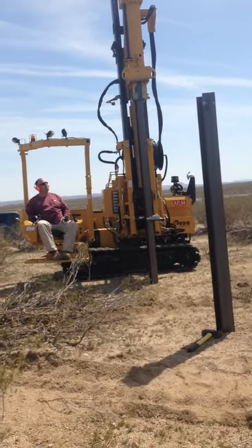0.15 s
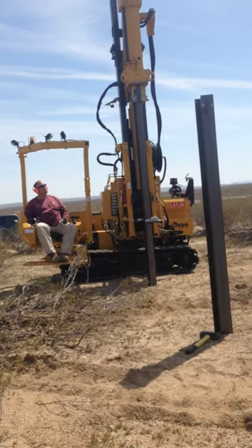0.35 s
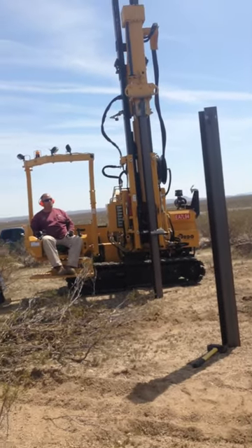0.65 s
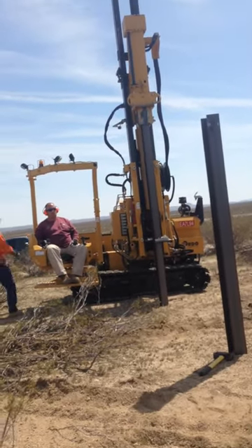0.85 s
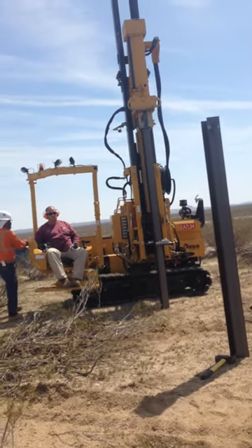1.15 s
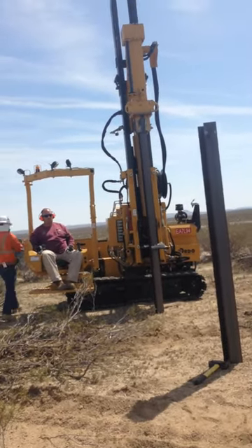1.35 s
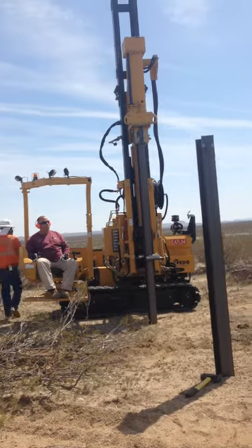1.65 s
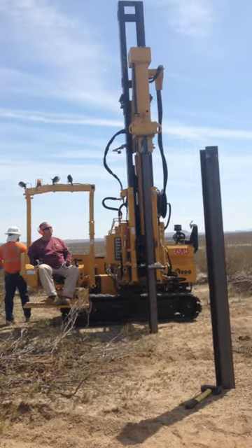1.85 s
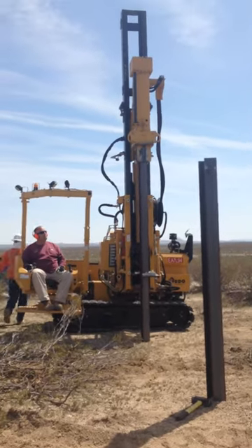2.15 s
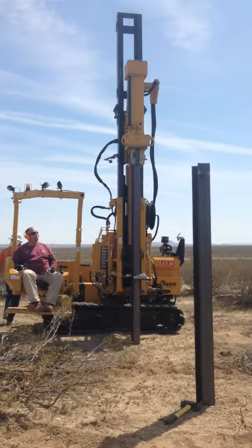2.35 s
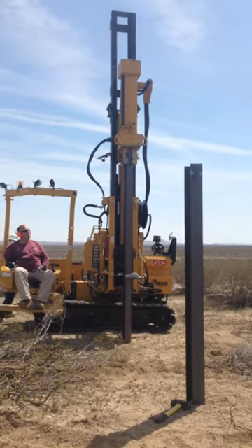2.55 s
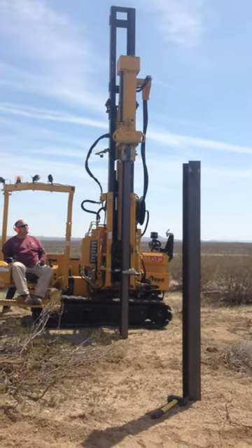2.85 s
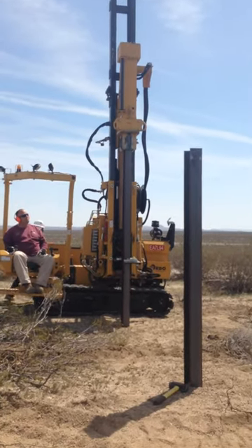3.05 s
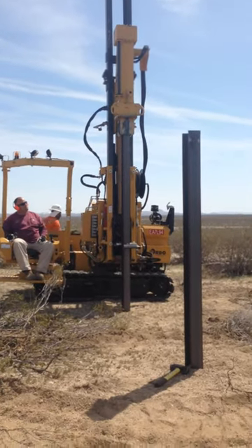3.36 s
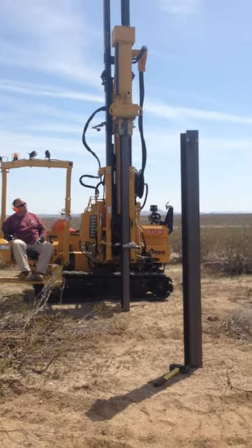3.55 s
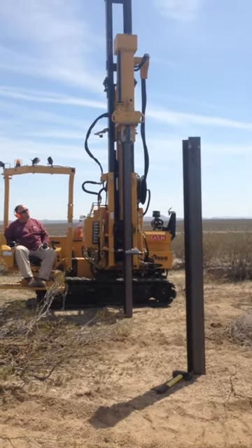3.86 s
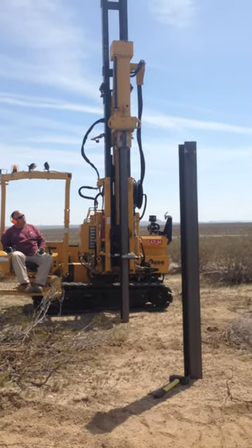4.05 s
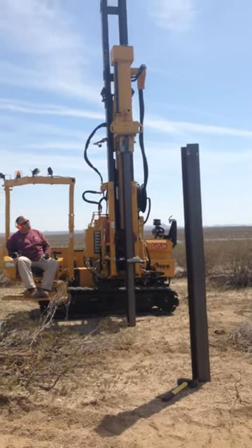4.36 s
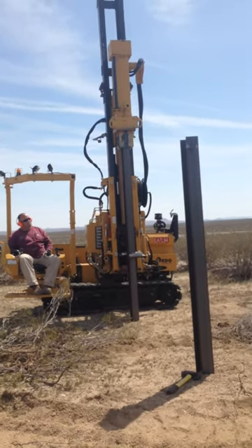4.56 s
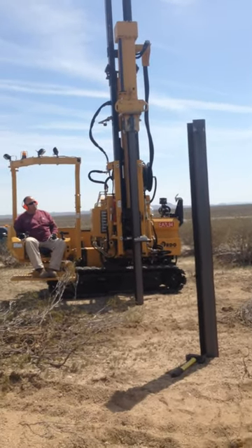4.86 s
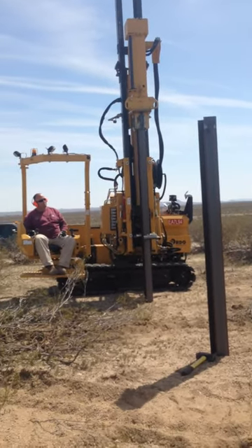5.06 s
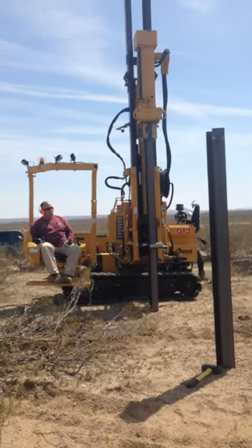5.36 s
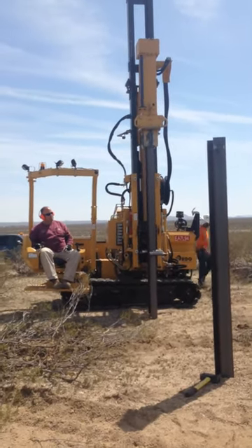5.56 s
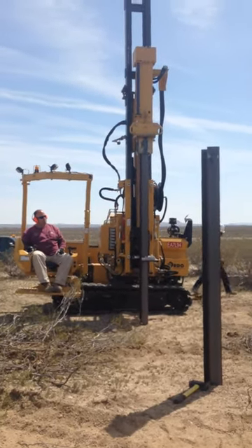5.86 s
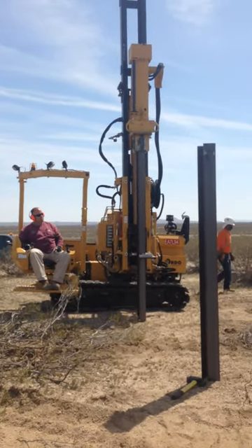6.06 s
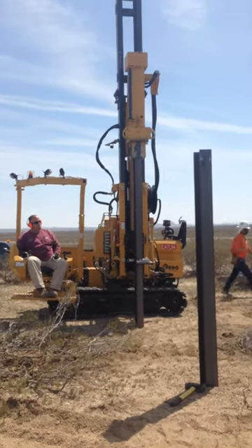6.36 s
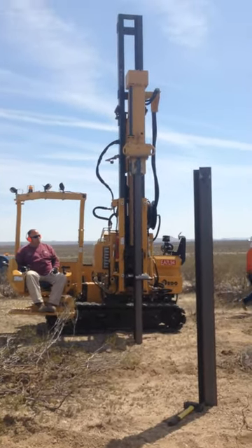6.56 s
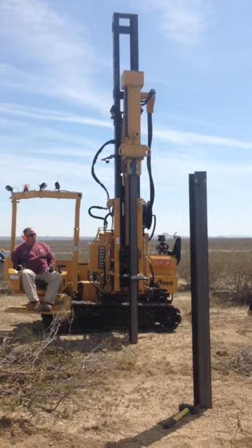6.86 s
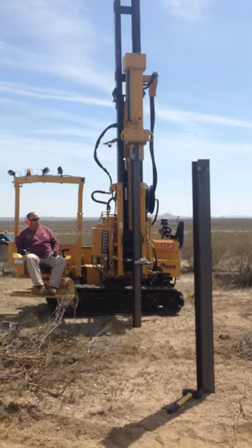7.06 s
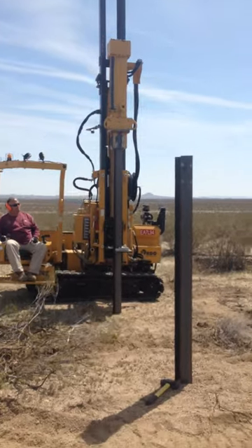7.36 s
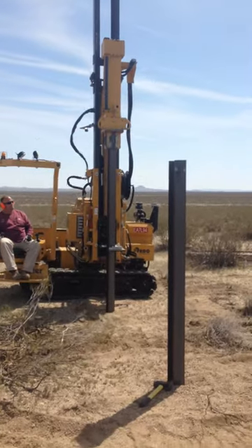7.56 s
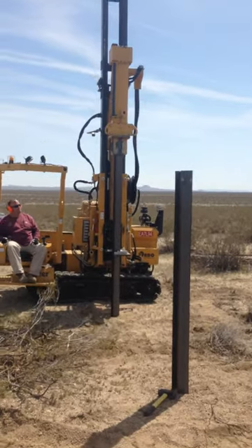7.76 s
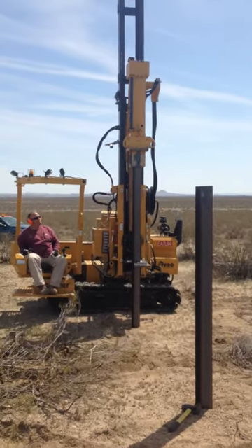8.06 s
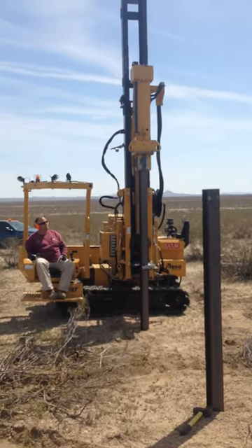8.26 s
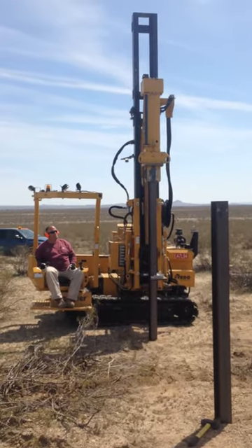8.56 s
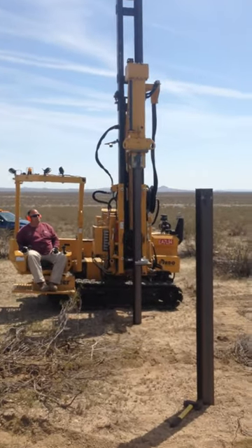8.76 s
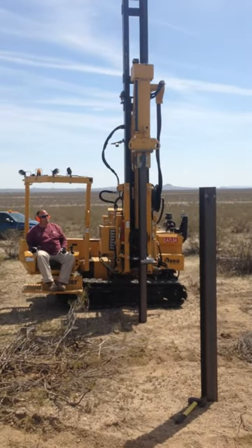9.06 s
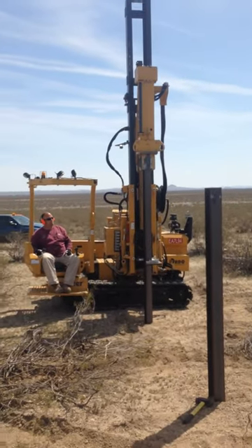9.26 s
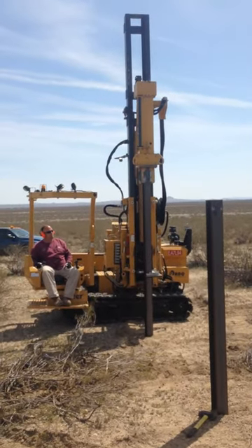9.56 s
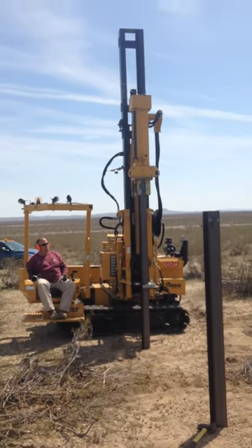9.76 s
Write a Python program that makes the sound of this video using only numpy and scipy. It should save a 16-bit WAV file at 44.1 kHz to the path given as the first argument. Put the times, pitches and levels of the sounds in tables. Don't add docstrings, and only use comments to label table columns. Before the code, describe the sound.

In open country, a hydraulic hammer drives a steel pile with continuous rapid blows, about sixteen a second. Each ticks, thuds and clangs, then a piercing high ring swells before the next. A diesel hums and roars beneath, with faint wind rumble. Late on, the handheld microphone turns and the thud grows harder and more midrange.

```python
import sys
import numpy as np
from scipy import signal
from scipy.fft import rfft, irfft
from scipy.io import wavfile
from scipy.ndimage import uniform_filter1d, minimum_filter1d

SR = 44100
rng = np.random.default_rng(int(sys.argv[2]) if len(sys.argv) > 2 else 0)


def unload_wav(signal):
    wavfile.write(
        sys.argv[1],
        SR,
        np.round(np.clip(np.atleast_2d(signal).T, -1, 1) * 32767).astype(np.int16),
    )


def boost_factor(decibels):
    exponent = np.asarray(decibels, float) / 20
    return 10 ** exponent


N = 436581
LENGTH, CONTACT = 12000, 3000
BLOW_HZ = np.fft.rfftfreq(LENGTH, 1 / SR)

# time in seconds, share of the turned view (0-1).
TURN = [
    (7.0, 0.13),
    (7.6, 0.99),
]
# time in seconds, then levels of machine, web clang,
# flange clang and flange ring in dB.
FACING = [(0.0, -27.5, -35.5, -14.5, -21), (0.65, -28, -34, -14.5, -20), (1.4, -26.5, -35, -12, -24.5),
          (1.7, -24.5, -33.5, -22, -17), (2.05, -22, -28, -17.5, -17), (2.3, -25.5, -33, -15, -17.5),
          (2.6, -20.5, -27.5, -13, -13.5), (2.9, -24.5, -34.5, -14, -19.5), (3.599, -23, -33, -19.5, -16.5),
          (4.399, -22, -31.5, -17.5, -19.5), (5.2, -25, -37, -10.5, -19.5), (6.0, -26, -38.5, -11, -22.5),
          (6.902, -26.5, -40.5, -12.5, -23.5), (7.701, -22.5, -25, -21.5, -16.5),
          (8.0, -22.5, -24, -17, -20), (8.3, -22, -28.5, -16, -25.5), (9.1, -23, -28.5, -12.5, -29),
          (9.9, -23, -32.5, -19, -19)]
# time in seconds, blows struck so far (count).
PACE = [(0.0076, 0), (0.6761, 11), (1.5239, 25), (2.1867, 36), (3.8251, 63), (4.0689, 67), (4.3117, 71),
        (4.7422, 78), (5.1077, 84), (6.1589, 101), (6.4638, 106), (7.8272, 128), (8.5101, 139),
        (9.8704, 161)]

BLOW_COUNT = 162
LEAD_S, JITTER_S = 0.0008, 0.0003
PACE_S, PACE_BLOWS = np.transpose(PACE)
BLOW_S = np.interp(np.arange(BLOW_COUNT), PACE_BLOWS, PACE_S) - LEAD_S
BLOW_S = BLOW_S + JITTER_S * rng.standard_normal(BLOW_COUNT)


def evened(x):
    return x / np.sqrt(np.mean(x ** 2) + 1e-20)


def read(points, hz):
    f, value = np.transpose(points)
    return np.interp(np.log(hz + 1), np.log(f + 1), value)


def causal(points):
    log_gain = np.log(boost_factor(read(points, BLOW_HZ)))
    mirrored = np.r_[log_gain, log_gain[-2:0:-1]]
    return np.exp(np.conj(signal.hilbert(mirrored)))[:len(BLOW_HZ)]


def band_response(order, edges_hz):
    sos = signal.butter(order, edges_hz, "band", fs=SR, output="sos")
    return signal.sosfreqz(sos, BLOW_HZ, fs=SR)[1]


def flange_guide():
    return band_response(2, (2730, 2985))


def turned_share(t):
    return np.interp(t, *np.transpose(TURN))


def breeze():
    level_db, gust_db, gusts_per_s = -55, 4, 14
    rumble = signal.sosfilt(signal.butter(2, 120, fs=SR, output="sos"), rng.standard_normal(N))
    lumps = rng.standard_normal(200)
    gusts = np.interp(np.arange(N) / SR * gusts_per_s, np.arange(len(lumps)), lumps)
    return boost_factor(level_db + gust_db * gusts) * evened(rumble)


def engine():
    # frequency in Hz, level in dB per Hz.
    roar_colour = [(25, -52.5), (60, -33), (100, -22.5), (220, -25), (420, -29.5), (800, -22),
                   (1600, -25.5), (2500, -20.5), (3500, -30.5), (4500, -53), (6500, -53), (9000, -68),
                   (10600, -52), (12500, -68), (16000, -74.5)]
    firing_hz = 102.3
    t = np.arange(N) / SR
    nearer_db = np.interp(t, *np.transpose(FACING)[:2]) + 23

    phase = 2 * np.pi * firing_hz * t + 1.73
    tone = np.sin(phase) + boost_factor(-14.5) * np.sin(2 * phase) + boost_factor(-8.5) * np.sin(3 * phase)
    tone *= np.sqrt(2) * boost_factor(-42 + 0.94 * nearer_db)

    real, imaginary, patches = rng.standard_normal((N // 256 + 5, 513, 3)).T
    patches = uniform_filter1d(patches, size=8, axis=0)
    patches = evened(uniform_filter1d(patches, size=12, axis=1))
    colour_db = read(roar_colour, np.fft.rfftfreq(1024, 1 / SR))[:, None]
    cells = (real + 1j * imaginary) * boost_factor(colour_db + 2.5 * patches)
    roar = evened(signal.istft(cells, nperseg=1024, noverlap=768)[1][:N])
    return tone + boost_factor(-32 + 0.95 * nearer_db) * roar


def contact(rise_s, t60, memory, fresh):
    t = np.arange(CONTACT) / SR
    old, new = rng.standard_normal((BLOW_COUNT, CONTACT, 2)).T
    renewal = np.sqrt(1 - memory ** 2)
    old[:, 0] /= renewal
    drift = signal.lfilter([renewal], [1, -memory], old).T
    pattern = drift * np.sqrt(1 - fresh ** 2) + fresh * new.T
    return pattern * (1 - np.exp(-t / rise_s)) ** 2 * boost_factor(-60 * t / t60)


def click(bounce_s, bounce_db):
    force = np.zeros((BLOW_COUNT, CONTACT))
    force[:, 30] = 1
    force[:, round(bounce_s * SR)] = boost_factor(bounce_db + 3 * rng.standard_normal(BLOW_COUNT))
    return force


def modes(table, sense=-1):
    t = np.arange(LENGTH) / SR
    signs = sense ** np.arange(len(table))
    rings = [boost_factor(-60 * t / t60) * np.sin(2 * np.pi * hz * t) / t60 for hz, t60, _, _ in table]
    rings = np.array(rings) * 2 * np.log(1000) / SR
    gains = boost_factor(np.transpose(table)[2:]) * signs
    return rfft(gains @ rings * (1 - np.exp(-t / 0.00051)) ** 2)


def strike(force, views, level_db, span_s):
    turned = turned_share(BLOW_S)[:, None]
    response = (1 - turned) * views[0] + turned * views[1]
    sounds = irfft(rfft(force, LENGTH) * response)
    start, stop = (np.array(span_s) * SR).astype(int)
    rms = np.sqrt(np.mean(sounds[:, start:stop] ** 2, axis=1))
    sounds *= (boost_factor(level_db) / rms)[:, None]
    out = np.zeros(N + LENGTH)
    for at, sound in zip(np.round(BLOW_S * SR).astype(int), sounds):
        out[at:at + LENGTH] += sound
    return out[:N]


def blow_levels():
    when, *parts = np.transpose(FACING)
    faced = np.array([np.interp(BLOW_S, when, part) for part in parts])
    thud_chance, web_chance, flange_chance = rng.standard_normal((3, BLOW_COUNT))
    ring_chance = 1 - rng.exponential(1, BLOW_COUNT)
    return faced + [1.2 * thud_chance, 1.9 * web_chance, 1.4 * flange_chance, 2.3 * ring_chance]


def ground(thud_db):
    t = np.arange(CONTACT) / SR
    push = np.sin(2 * np.pi * 88 * t) * t * boost_factor(-60 * t / 0.026)
    return strike(push * np.ones((BLOW_COUNT, 1)), np.ones((2, 1)), -26 + 0.68 * thud_db, (0, .03))


def rebound(thud_db):
    # frequency in Hz, t60 in seconds, level in dB, level after the turn in dB.
    touched = [(2290, .06, -2, -2), (10720, .025, -23, -21)]
    late = contact(rise_s=0.0026, t60=0.023, memory=0.38, fresh=0.22)
    late = np.roll(late, round(0.031 * SR), axis=1)
    return strike(late, modes(touched), thud_db - 19.0, (.03, .045))


def ring_dips():
    t, total_db = np.arange(N) / SR, 0
    lull_db = -5 * (1 - turned_share(t))
    for dip_db, at_s, width_s in ((-3.5, -0.0017, 0.0093), (lull_db, 0.025, 0.005)):
        nearest = np.round(np.interp(t - at_s, BLOW_S, np.arange(BLOW_COUNT))).astype(int)
        away_s = t - at_s - BLOW_S[nearest]
        total_db = total_db + dip_db * np.exp(-.5 * (away_s / width_s) ** 2)
    return boost_factor(total_db)


def ring(ring_db):
    # frequency in Hz, t60 in seconds, level in dB, level after the turn in dB.
    ring_modes = [(2771.5, .32, 0, 0), (2803, .24, -7, -6), (2845, .12, -12, -14)]
    narrow = band_response(1, (2750, 2805))
    swell = contact(rise_s=0.019, t60=0.25, memory=0.9326, fresh=0.28)
    views = narrow * flange_guide() * modes(ring_modes)
    return ring_dips() * strike(swell, views, ring_db + 2.0, (.015, .058))


def flange(flange_db):
    # frequency in Hz, t60 in seconds, level in dB, level after the turn in dB.
    flange_modes = [(2885, .022, 0, 0), (2935, .045, -9, -18)]
    sharp = click(bounce_s=.014, bounce_db=-19)
    rattle = contact(rise_s=0.0009, t60=0.092, memory=.92, fresh=0.16)
    views = flange_guide() * modes(flange_modes, sense=0.67)
    return strike(sharp + boost_factor(-29) * rattle, views, flange_db - .6, (0, .012))


def web(tap, web_db):
    # frequency in Hz, t60 in seconds, level in dB, level after the turn in dB.
    web_modes = [(1683, 0.013, -5.5, -13.5), (1762, 0.025, 4.5, 4.5), (2071, 0.081, -6, -14)]
    rattle = contact(rise_s=0.00019, t60=0.057, memory=0.956, fresh=0.058)
    return strike(tap + boost_factor(-15) * rattle, modes(web_modes), web_db + 11.0, (0, .015))


def frame(tap, thud_db):
    frame_hz = [310, 427, 550, 615, 680, 812, 1080, 2258, 2325, 3500, 4075, 4900, 5200, 5545, 5780, 6355,
                6910, 8000, 8310, 8525, 9600, 10300, 10700]
    # t60 in seconds, level in dB, level after the turn in dB.
    frame_rings = [(0.069, -9, -4), (0.09, 0, -12), (0.1, -4, -1.5), (0.11, -5.5, -4), (0.026, -27, -2),
                   (0.073, -5.5, -10.5), (0.098, -13, -15.5), (0.29, -1.5, -1.5), (0.043, 2.5, -2),
                   (0.23, -4, -10), (0.15, -20, -15), (0.15, -24.5, -25), (0.062, -30, -27),
                   (0.081, -23.5, -27.5), (0.046, -34, -27), (0.18, -46, -43), (0.16, -43, -31),
                   (0.09, -40, -40), (0.047, -37.5, -48.5), (0.04, -40.5, -48), (0.1, -46.5, -47),
                   (0.077, -36, -37), (0.027, -32, -32)]
    return strike(tap, modes(np.c_[frame_hz, frame_rings]), thud_db + 2.58, (0, .015))


def tick(thud_db):
    # frequency in Hz, level in dB per Hz.
    edge_colour = [(2000, -32), (5500, -5), (7500, -1), (9000, -9), (10700, 3.5), (12500, -8), (16000, -12)]
    edge = causal(edge_colour)
    louder = np.minimum(rng.exponential(1, BLOW_COUNT), 2.5)
    level_db = -54.0 + 1.7 * louder + 0.54 * (thud_db + 26.5)
    rattle = contact(rise_s=.0003, t60=0.062, memory=0.95, fresh=0.39)
    return strike(rattle, [edge, boost_factor(-4) * edge], level_db, (0, .01))


def thud(knock, thud_db):
    # frequency in Hz, level in dB per Hz.
    thud_colour = [(40, -28), (120, -24.5), (260, -26.5), (420, -1.5), (700, -19), (1400, -13),
                   (2600, -10.5), (3300, -15.5), (4500, -22.5), (6000, -31.5), (7500, -62.5), (10000, -39),
                   (12500, -56), (16000, -58.5)]
    # frequency in Hz, level in dB per Hz.
    thud_colour_turned = [(40, -16), (120, -28.5), (260, -18.5), (420, -17.5), (700, 7.5), (1400, 5.5),
                          (2600, -9), (3300, -0.5), (4500, -13), (6000, -34.5), (7500, -56), (10000, -40.5),
                          (12500, -56.5), (16000, -55.5)]
    body = np.array([causal(thud_colour), causal(thud_colour_turned)])
    return strike(knock, body, thud_db - 1.5, (0, .015))


def hammer():
    thud_db, web_db, flange_db, ring_db = blow_levels()
    knock = contact(rise_s=0.00022, t60=0.13, memory=0.872, fresh=0.65)
    knock = knock + boost_factor(-10.0) * contact(rise_s=0.001, t60=0.21, memory=.8, fresh=0.73)
    tap = click(bounce_s=.009, bounce_db=-14.5) + boost_factor(-29.0) * knock
    low = ground(thud_db) + thud(knock, thud_db) + frame(tap, thud_db)
    clang = web(tap, web_db) + flange(flange_db) + ring(ring_db)
    return low + clang + tick(thud_db) + rebound(thud_db)


def scene():
    return (breeze() + engine() + hammer())[None]


def band_limit(x):
    return signal.sosfilt(signal.butter(12, 15830, fs=SR, output="sos"), x)


def record(dry):
    x = signal.sosfilt(signal.butter(2, 55, "high", fs=SR, output="sos"), dry)
    ceiling = .72
    allowed = minimum_filter1d(np.minimum(1, ceiling / (abs(x) + 1e-9)), size=121)
    x = x * uniform_filter1d(uniform_filter1d(allowed, size=60), size=60)
    return band_limit(x)


dry = scene()
out = record(dry)
unload_wav(out)
```